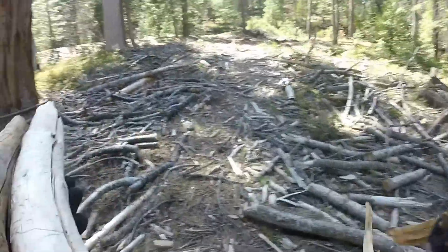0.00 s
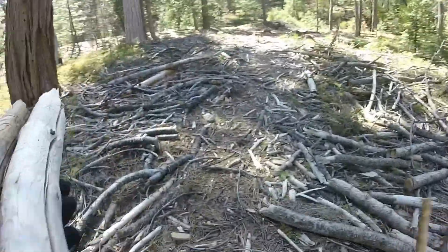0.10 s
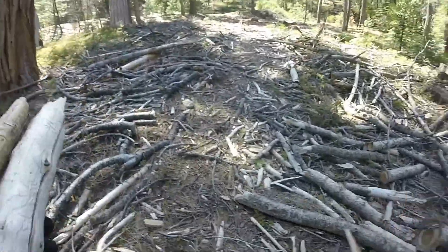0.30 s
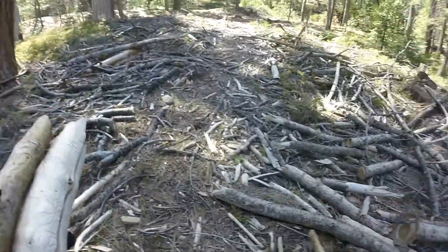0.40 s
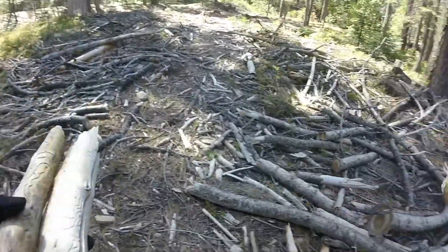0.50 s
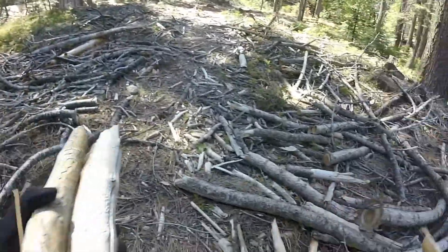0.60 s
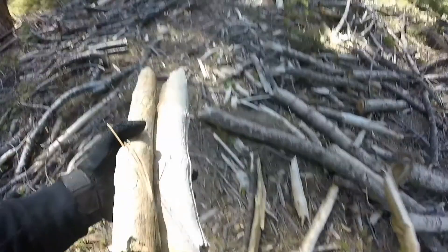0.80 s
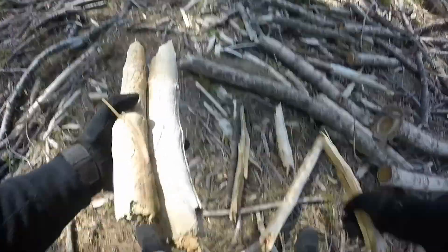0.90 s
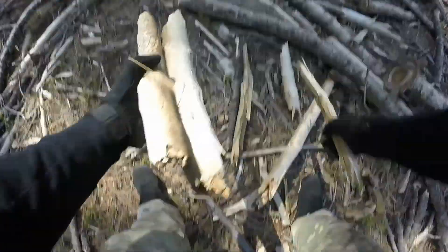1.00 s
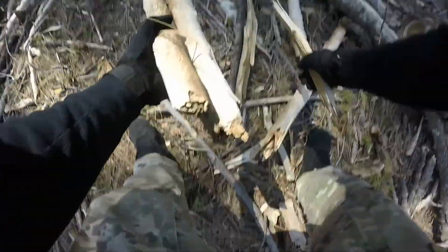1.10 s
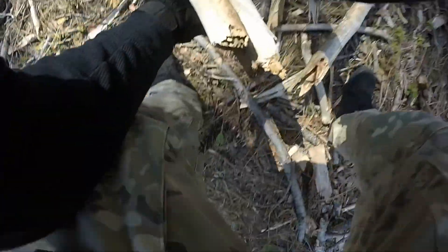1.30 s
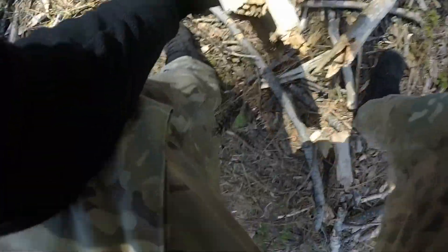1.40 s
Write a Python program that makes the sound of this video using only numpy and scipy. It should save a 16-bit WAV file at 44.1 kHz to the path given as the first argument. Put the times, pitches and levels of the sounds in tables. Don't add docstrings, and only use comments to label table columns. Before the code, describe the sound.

Dry logs clatter close to a body-worn microphone: a sharp crack and tap, a heavy double thud, a broad tap, then hollow knocks ending in the hardest, with cloth rustle in a quiet forest.

```python
import sys
import numpy as np
from scipy import signal
from scipy.fft import rfft, irfft, next_fast_len
from scipy.io import wavfile
from scipy.ndimage import uniform_filter1d, map_coordinates

SR = 44100
rng = np.random.default_rng(int(sys.argv[2]) if len(sys.argv) > 2 else 0)


def ratio(d):
    e = np.asarray(d, float) / 20
    return 10 ** e


def generate_wav(sig):
    pcm = np.round(np.clip(np.atleast_2d(sig).T, -1, 1) * 32767).astype(np.int16)
    wavfile.write(sys.argv[1], SR, pcm)


N = 66150


def unit(x):
    return x / np.sqrt(np.mean(x ** 2) + 1e-20)


def curve(rows):
    return np.interp(np.arange(N) / SR, *np.transpose(rows))


def wobble(rate_hz):
    return map_coordinates(rng.standard_normal(N // 8), [np.arange(N) * rate_hz / SR])


def filtered(x, response):
    m = next_fast_len(len(x) + 8192)
    return irfft(rfft(x, m) * response(np.fft.rfftfreq(m, 1 / SR)), m)[:len(x)]


def rush(spectrum, grain_db, grain_hz):
    f_hz, db = np.transpose(spectrum)
    rough = rng.standard_normal(N) * ratio(grain_db * wobble(grain_hz))
    return unit(filtered(rough, lambda hz: ratio(np.interp(np.log(hz + 1), np.log(f_hz + 1), db))))


def add(track, t_s, sound):
    track[round(t_s * SR):][:len(sound)] += sound


# [t/s, peak level/dB, second mode level/dB, upper modes level/dB, ring length factor]
KNOCKS = [
    (0.8121, -9.5, 1, -18, 0.82),
    (0.8896, -16, -4.5, -21.5, 1.01),
    (.983, -28, 1.5, -12, 0.75),
    (1.0565, -35, 6, -8, 1),
    (1.0642, -13.5, -3.5, -24.5, 0.74),
    (1.0772, -32, 6, -20, 0.79),
    (1.0812, -13, -13, -26.5, 0.89),
    (1.148, -4.5, -8.5, -15, 0.83),
]
# [f/Hz, level/dB, t60/s]
LOG_MODES = [(748.3, -2, 0.038), (874, -3, 0.023), (1067, -2, 0.02), (1258, -8.5, 0.025),
             (1590, -10, 0.019), (1755, -8, 0.03), (2000, -10, 0.021)]


def log_knocks():
    rise_s = .001
    out, t = np.zeros(N + SR), np.arange(SR // 8) / SR
    hz, level_db, t60_s = np.transpose(LOG_MODES)[:, :, None]
    k = np.arange(len(LOG_MODES))[:, None]
    for t_s, peak_db, mate_db, upper_db, ring in KNOCKS:
        mode_db = level_db + np.where(k == 1, mate_db, 0) + np.where(k > 1, upper_db, 0)
        gain = ratio(mode_db - 60 * t / (t60_s * ring))
        modes = (-1.) ** k * gain * np.sin(2 * np.pi * hz * t)
        rise = (1 - np.exp(-t / rise_s)) ** 2
        add(out, t_s, ratio(peak_db + 5.5) * rise * modes.sum(0))
    return out[:N]


# [t/s, peak level/dB, centre/octaves re 600 Hz, spread/octaves, ring length factor]
THUDS = [(.0002, -24.5, 0.3, 0.77, 1.12), (.1445, -34.5, 1.6, 0.54, 1.1), (.1708, -29, 0.56, 0.64, 0.58),
         (.293, -24, -0.19, 0.68, 1.27), (0.3238, -6.5, -0.16, 0.73, 0.8), (0.3346, -10, 0.2, 0.9, 0.8),
         (.3402, -7, 0.44, 0.56, 0.89), (.3345, -9, -1.58, 0.29, 1.74), (.337, -12, 2, 0.6, 0.77),
         (.4683, -14, 1.88, 0.64, 0.45), (.4684, -19.5, -0.18, .12, 0.8), (.5425, -24.5, 0.25, 0.14, 0.69),
         (.7115, -32, 0.2, 0.38, 0.34), (.729, -26.5, -0.65, 0.71, 0.31), (.748, -31, -0.12, 0.52, 1.1),
         (.783, -23.5, -0.16, 0.28, 1.5), (.803, -24, -0.42, 0.69, 0.27), (.837, -19, 0.08, 0.28, 0.62)]
# [f/Hz, level/dB, t60/s]
BRANCH_MODES = [(150, 1, 0.11), (266.4, 0, 0.071), (347, 3.5, 0.077), (434, -1, 0.038), (516, -2.5, 0.051),
                (637.5, 4, 0.035), (736.6, 0, 0.056), (895, -12, 0.02), (1104, 3, 0.034), (1320, -5, 0.043),
                (1610, -5, 0.071), (1960, 0, 0.038), (2190, -6, 0.027), (2350, -4.5, 0.015)]
# [t/s, peak level/dB, centre/octaves re 600 Hz, spread/octaves, ring length factor]
TAPS = [
    (.2113, -12.5, 0.24, 0.19, 0.61),
    (.2145, -19.5, -1.17, 0.63, 0.88),
    (.2128, -19, 1.9, 0.26, 0.74),
    (.4113, -12, -0.23, 1.5, 0.59),
    (.419, -14.5, -0.18, 0.42, 0.56),
    (1.4948, -13.5, -1.04, 1.54, 0.72),
]
# [f/Hz, level/dB, t60/s]
STICK_MODES = [(374.4, 6, 0.038), (718, 2, 0.055), (888, 3.5, 0.067), (1356, -7, 0.067), (1760, -11, 0.061),
               (2090, 0, 0.031), (2600, -33, 0.018)]


def thuds(blows, body):
    contact_s, rise_s, swing_rad, scatter_rad = .001, .00065, .5, .5
    out, t = np.zeros(N + SR), np.arange(SR // 6) / SR
    hz, level_db, t60_s = np.transpose(body)[:, :, None]
    for t_s, peak_db, centre, spread, ring in blows:
        tone_db = -9 * ((np.log2(hz / 600) - centre) / spread) ** 2
        gain = ratio(level_db + tone_db - 60 * t / (t60_s * ring))
        phase = scatter_rad * rng.standard_normal((len(body), 1)) - swing_rad
        modes = gain * np.cos(2 * np.pi * hz * (t - contact_s) + phase)
        add(out, t_s, ratio(peak_db - 6.5) * (1 - np.exp(-t / rise_s)) * modes.sum(0))
    return out[:N]


# [t/s, peak level/dB, centre/octaves re 3 kHz, spread/octaves, t60/s]
CRACKS = [(.0002, -23, -0.34, 0.87, 0.016), (0.041, -37.5, 0.74, 0.35, 0.038),
          (0.063, -26, -1.46, 1, 0.031), (0.1276, -33, 0.075, 1.4, 0.017), (0.169, -28, -0.42, 0.7, 0.014),
          (0.2111, -12, -0.26, 0.94, 0.015), (0.2152, -14, 0.039, 1.25, 0.019),
          (0.23, -28.5, 0.84, 0.73, 0.016), (0.2735, -25, 0.013, 1.7, 0.018),
          (0.292, -28.5, 0.065, 2.1, 0.024), (0.3248, -14.5, -0.82, 0.96, 0.018),
          (0.3349, -21, -0.38, 0.88, 0.056), (0.339, -29, 0.72, 0.4, 0.055),
          (0.412, -29, -0.88, 0.87, 0.062), (0.4683, -26, 0.1, 0.9, 0.025), (.578, -50, 0.8, 1.1, 0.048),
          (0.725, -44, 0.69, 1.8, 0.032), (0.786, -42.5, 0.75, 0.15, 0.03), (1.1478, -30, -.7, 0.4, 0.02),
          (1.4947, -24.5, -0.1, 0.92, 0.083)]


def cracks():
    tear_s, spike_db, lump_db, lump_hz = .0004, 4, 3, 600
    after_db, after_t60_s = -23, .09
    out, t = np.zeros(N + SR), np.arange(SR // 6) / SR
    for t_s, peak_db, centre, spread, t60_s in CRACKS:
        noise, swell, lumps = rng.standard_normal((3, len(t)))

        def colour(hz):
            octaves = np.log2(hz / 3000 + 1e-6) - centre
            lumpy = ratio(lump_db * map_coordinates(lumps, [hz / lump_hz]))
            return lumpy / (1 + (octaves / spread) ** 2) ** 1.3

        spikes = noise * ratio(spike_db * unit(uniform_filter1d(swell, size=20)))
        decay = ratio(-60 * t / t60_s) + ratio(after_db - 60 * t / after_t60_s)
        shape = (1 - np.exp(-t / tear_s)) * decay
        burst = unit(filtered(spikes, colour)) * shape
        add(out, t_s, ratio(peak_db - 7) * burst * np.linalg.norm(shape) / np.linalg.norm(burst))
    return out[:N]


# [t/s, peak level/dB, f/Hz, t60/s]
SPLINTERS = [(.036, -44, 5930, 0.015), (.042, -44, 7500, 0.011), (.0505, -41, 5900, .008),
             (.0506, -47, 7850, .008), (.064, -41, 4760, .012), (.1274, -27, 3100, 0.011),
             (.1274, -33.5, 6920, .012), (.1275, -32, 7750, 0.013), (.1274, -35.5, 11300, 0.014),
             (.1275, -37, 13200, .01), (.146, -35, 3000, .015), (.171, -41, 4830, .01),
             (0.2114, -6.5, 2930, 0.0033), (.2112, -18, 4700, .008), (.2113, -24, 5850, 0.0051),
             (.2115, -25, 7600, .006), (.212, -28.5, 1546, 0.029), (.2146, -14, 4540, 0.0077),
             (0.2145, -18, 3960, 0.0093), (.2146, -14.5, 3230, .01), (.2147, -19.5, 2130, 0.013),
             (.2148, -18.5, 7400, 0.0061), (.2148, -24, 12200, 0.0051), (.2152, -22, 5730, 0.01),
             (.2225, -37.5, 7140, .015), (.2312, -33, 4370, 0.0087), (.269, -37, 2700, .006),
             (.2741, -32, 8060, .008), (0.2765, -44, 4860, .01), (.276, -33, 1320, 0.019),
             (.293, -27, 2960, 0.017), (.293, -34, 6300, .008), (.2933, -30.5, 9300, 0.013),
             (.293, -31, 13000, 0.009), (.294, -34, 1290, 0.031), (.2962, -26, 667, 0.044),
             (.324, -29.5, 2404, .04), (0.323, -33, 3030, 0.011), (.3355, -25, 1970, 0.0082),
             (.336, -18.5, 3100, 0.019), (.3375, -18, 2463, 0.023), (.338, -34.5, 4590, 0.047),
             (1.1478, -41.5, 3635, 0.011), (1.148, -34, 5060, 0.0079), (1.1478, -35.5, 5690, 0.0081),
             (1.1485, -19.5, 2350, .007), (1.148, -24, 547, 0.011)]
# [t/s, peak
# level/dB, f/Hz, t60/s]
SHORT_TONES = [(.277, -38, 2270, 0.017), (0.2974, -31, 2300, .012), (0.3245, -5.5, 623, 0.0095),
               (0.3368, -3, 760, .013), (.4687, -33, 5900, .01), (.5425, -31, 700, 0.01),
               (0.812, -16, 1010, .012), (1.0782, -16, 933, 0.02), (1.0778, -34, 1770, 0.014),
               (1.1476, -12.5, 1040, 0.0077), (1.15, -27, 1930, .014)]


def ring_downs(events):
    snap_s = .0003
    out, t = np.zeros(N + SR), np.arange(SR // 12) / SR
    for t_s, peak_db, hz, t60_s in events:
        gain = ratio(peak_db - 60 * t / t60_s) * (1 - np.exp(-t / snap_s))
        add(out, t_s, gain * np.sin(2 * np.pi * hz * t))
    return out[:N]


def trees(x):
    t60_s, delay_samples = .09, 150
    t = np.arange(SR // 4) / SR
    tail = uniform_filter1d(rng.standard_normal(len(t)), size=4) * ratio(-60 * t / t60_s)
    return signal.fftconvolve(np.pad(x, (delay_samples, 0)), tail / np.linalg.norm(tail))[:N]


# [t/s, level/dB]
CLOTH = [(0, -54), (.07, -56), (.12, -52), (.18, -55.5), (.3, -62.5), (.5, -56.5), (.56, -61), (.7, -58.5),
         (.73, -57), (.86, -53.5), (.93, -63.5), (.98, -50), (1.05, -44.5), (1.1, -49), (1.13, -62),
         (1.2, -60), (1.33, -55.5), (1.5, -59)]
# [f/Hz, level/dB per Hz]
CLOTH_COLOUR = [(530, -30), (900, 5.5), (1330, -0.5), (1590, -5), (2250, -0.5), (4330, -12), (4820, -18),
                (5980, -17.5), (15500, -39.5)]


def cloth():
    return ratio(curve(CLOTH) + wobble(28.2)) * rush(CLOTH_COLOUR, grain_db=1.5, grain_hz=380)


# [t/s, level/dB]
RUB = [(0, -43), (.1, -45.5), (.19, -44.5), (.4, -48.5), (.52, -45.5), (.65, -52), (.74, -43), (.85, -44),
       (.93, -51), (1.0, -45), (1.1, -49), (1.2, -50), (1.32, -48), (1.5, -50)]
# [f/Hz, level/dB per Hz]
RUB_COLOUR = [(59, -17), (100, -10.5), (221, -7), (305, -5.5), (389, -5), (861, -6), (1400, -31.5),
              (1820, -17.5), (3080, -120)]


def rub():
    return ratio(curve(RUB)) * rush(RUB_COLOUR, grain_db=2.5, grain_hz=120)


# [t/s, level/dB]
LEAVES = [(0, -57.5), (.06, -57.5), (.19, -60.5), (.38, -68.5), (.5, -60.5), (.62, -59.5), (.7, -65.5),
          (.73, -59.5), (.85, -58), (.9, -66.5), (1.05, -70.5), (1.2, -68.5), (1.38, -65), (1.5, -67.5)]
# [f/Hz, level/dB per Hz]
LEAF_COLOUR = [(2940, -5), (5000, -5.5), (7230, -8.5), (13300, -12), (15500, -15)]


def leaves():
    return ratio(curve(LEAVES) + wobble(73)) * rush(LEAF_COLOUR, grain_db=3, grain_hz=1100)


# [f/Hz, level/dB per Hz]
RUMBLE_COLOUR = [(8.8, -29.5), (15, -3), (32, 4), (81, -9), (150, -13.5), (200, -26), (330, -120)]


def rumble():
    return ratio(-52.5 + wobble(1.4)) * rush(RUMBLE_COLOUR, grain_db=1, grain_hz=11.3)


def scene():
    low_cut_hz, trees_db = 80, -26.5
    blows = log_knocks() + thuds(THUDS, BRANCH_MODES) + thuds(TAPS, STICK_MODES)
    breaks = cracks() + ring_downs(SPLINTERS) + ring_downs(SHORT_TONES)
    wood = filtered(blows + breaks, lambda hz: (1j * hz / (low_cut_hz + 1j * hz)) ** 2)
    return (wood + ratio(trees_db) * trees(wood) + cloth() + rub() + leaves() + rumble())[None]


# [f/Hz, width/Hz, lift/dB]
HOUSING = [(2420, 400, 5), (4550, 700, 4), (5700, 500, 4)]


def case(hz):
    response = 1
    for f_hz, width_hz, lift_db in HOUSING:
        damping = 1j * hz * width_hz
        response = response + (ratio(lift_db) - 1) * damping / (f_hz ** 2 - hz ** 2 + damping)
    return response


def top_cut(x):
    return signal.sosfilt(signal.butter(12, 16230, fs=SR, output="sos"), x)


def record(dry):
    edge_hz, top_hz, soft_top = 15100, 16200, .95
    x = filtered(dry[0], lambda hz: case(hz) * (hz < top_hz) / (1 + (hz / edge_hz) ** 24))
    mix = x / (1 + np.abs(x / soft_top) ** 6) ** (1 / 6)
    return top_cut(mix[None])


dry = scene()
out = record(dry)
generate_wav(out)
```